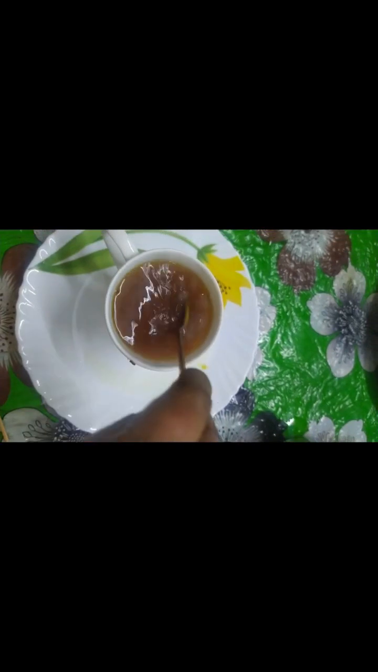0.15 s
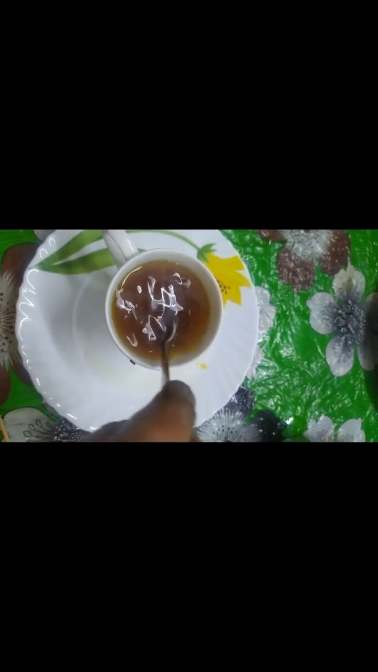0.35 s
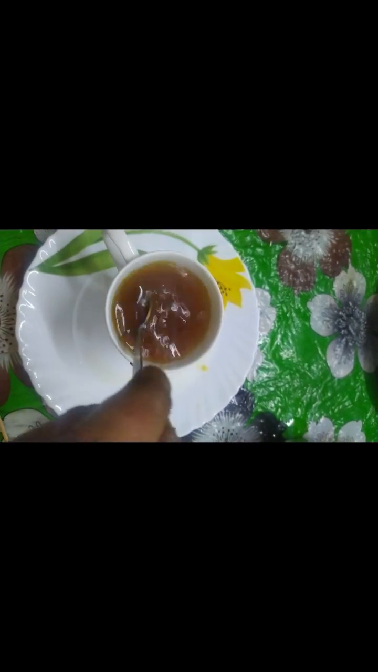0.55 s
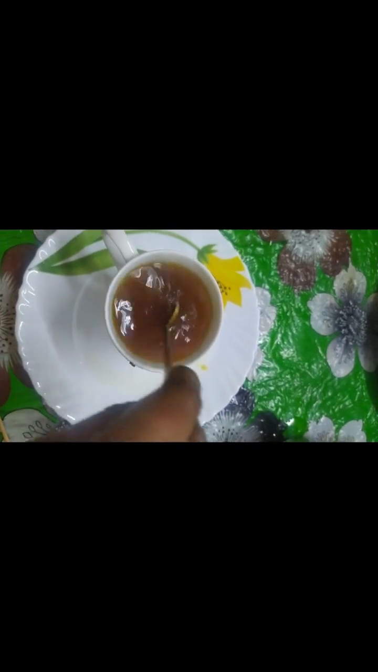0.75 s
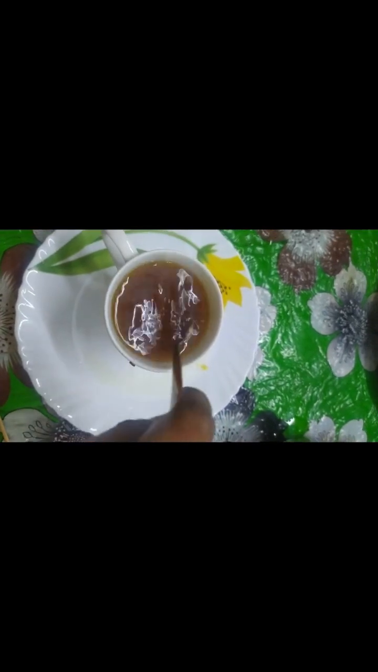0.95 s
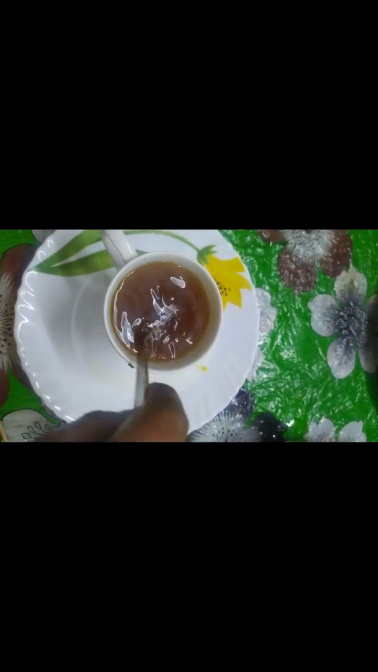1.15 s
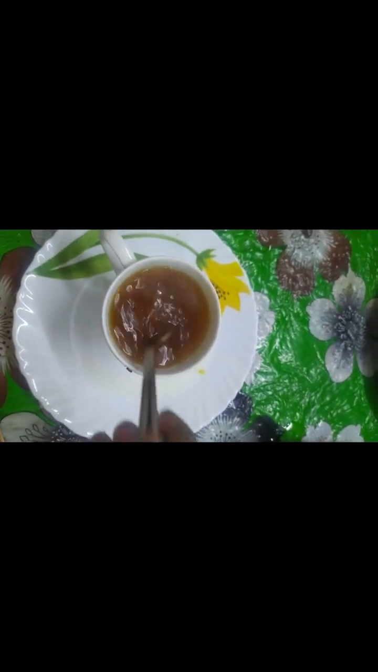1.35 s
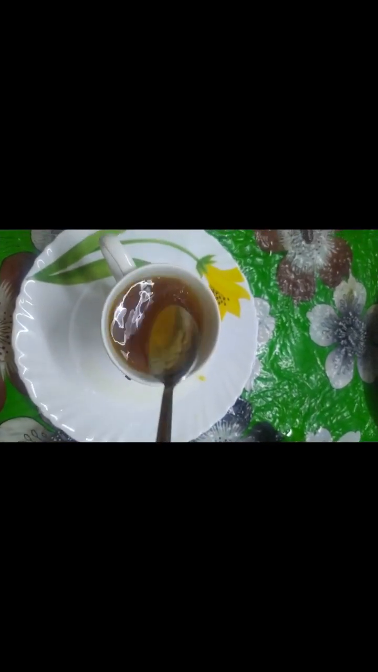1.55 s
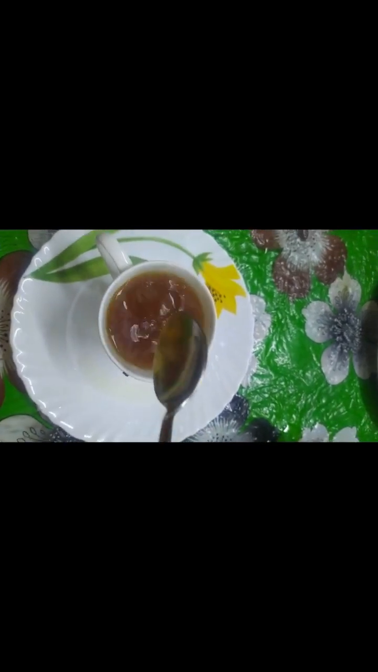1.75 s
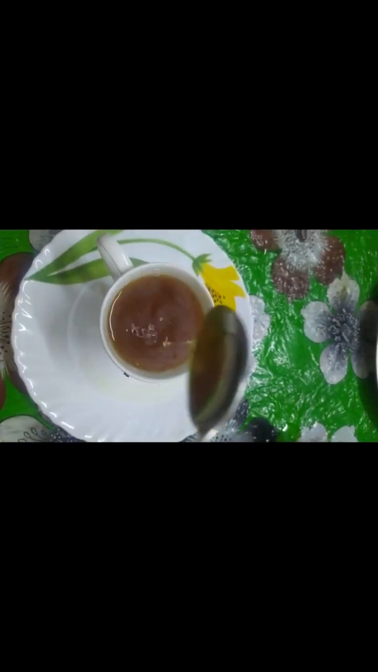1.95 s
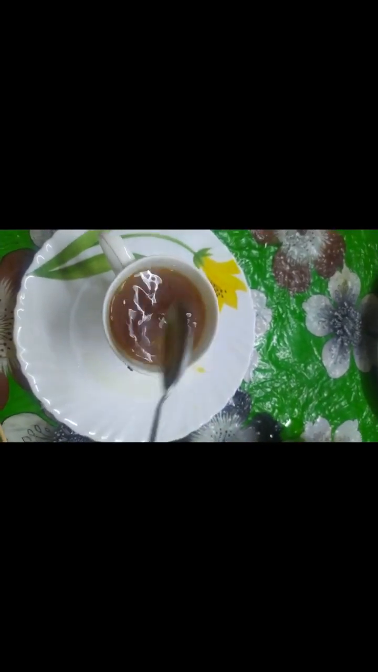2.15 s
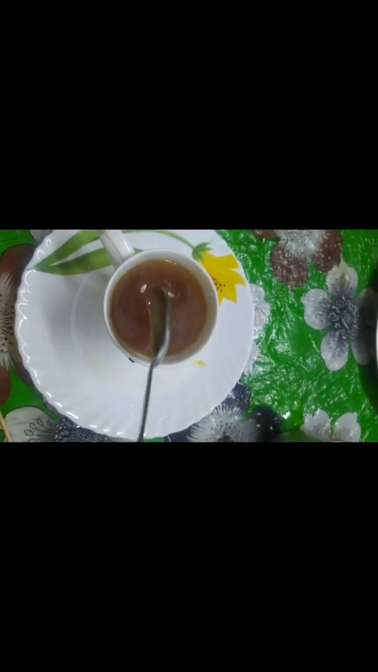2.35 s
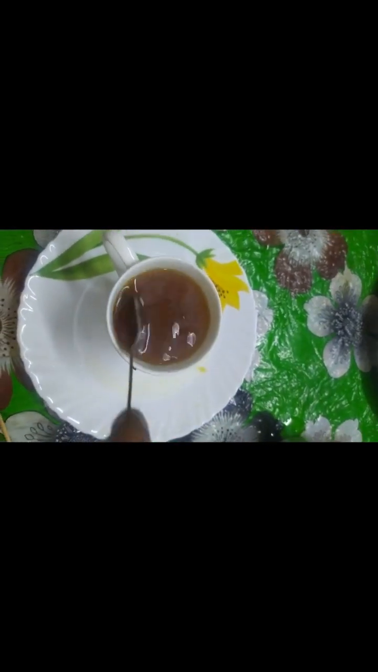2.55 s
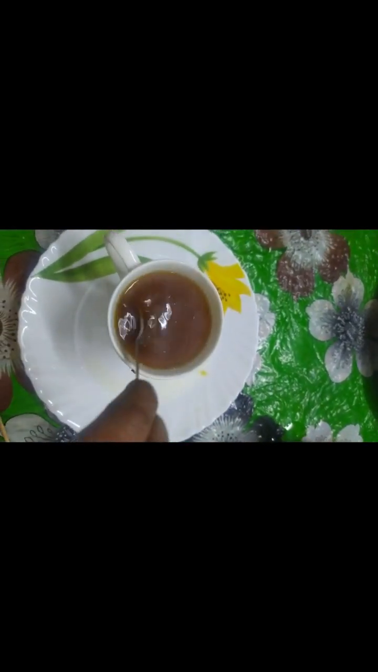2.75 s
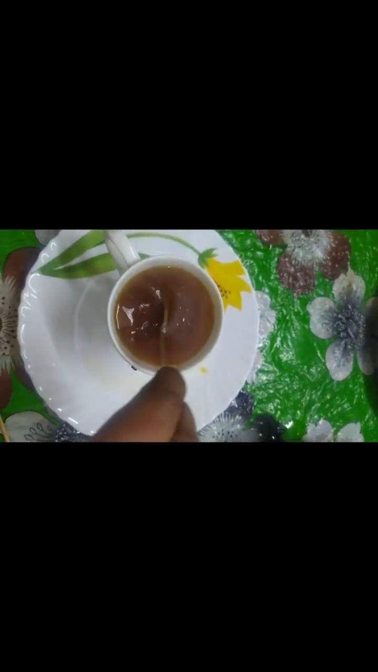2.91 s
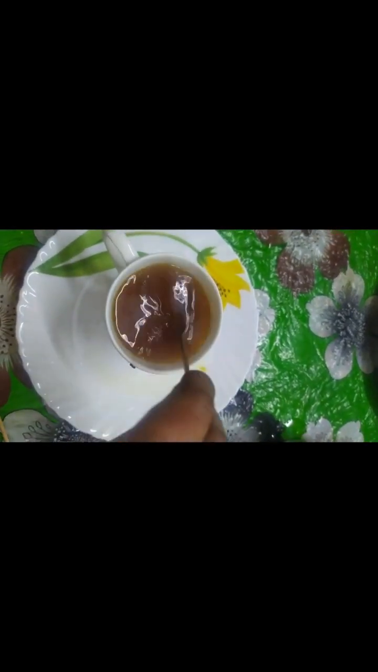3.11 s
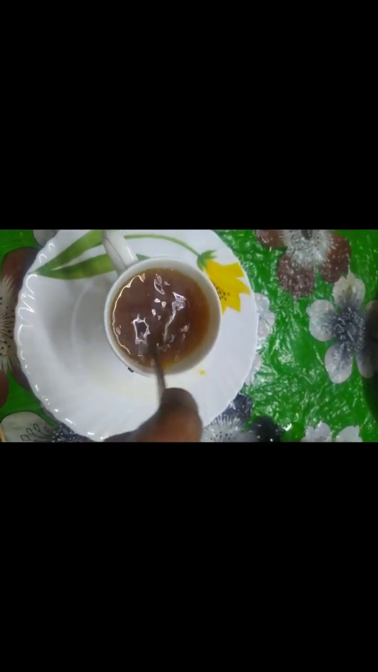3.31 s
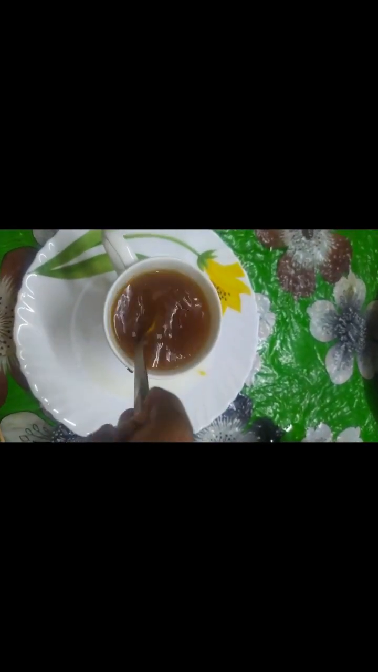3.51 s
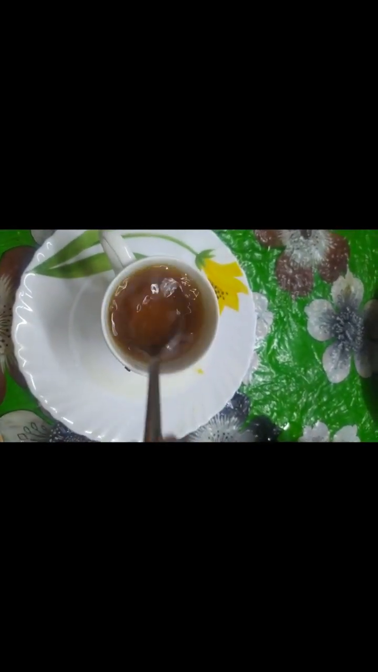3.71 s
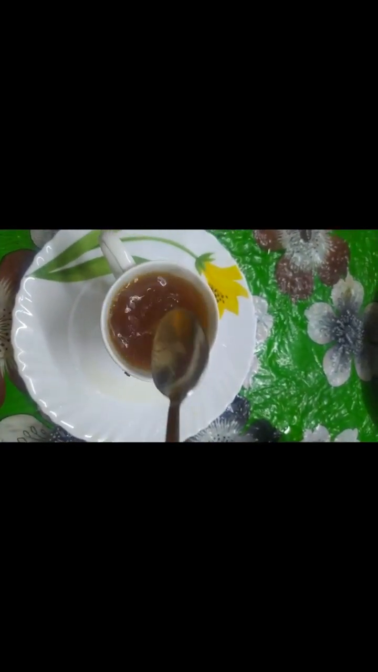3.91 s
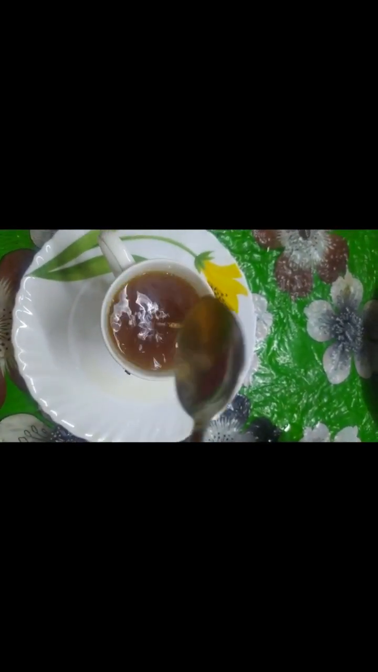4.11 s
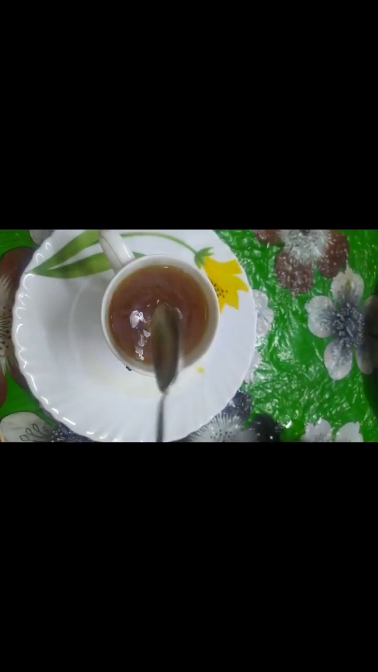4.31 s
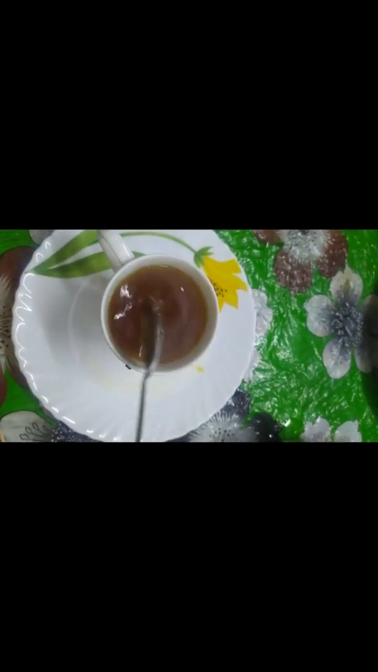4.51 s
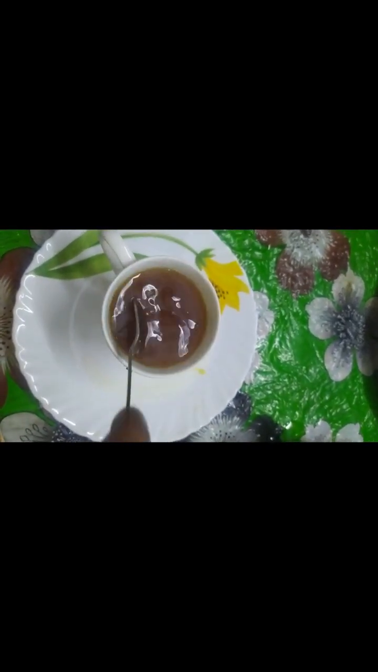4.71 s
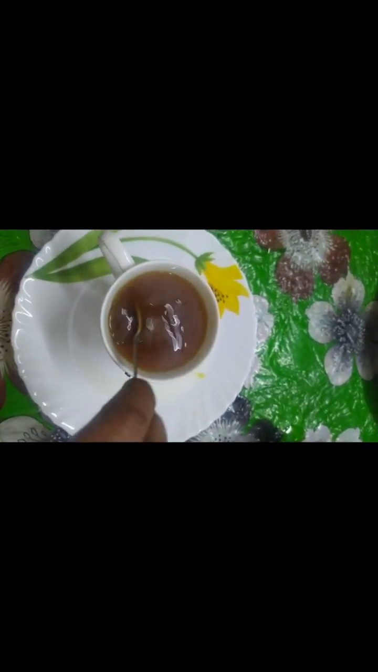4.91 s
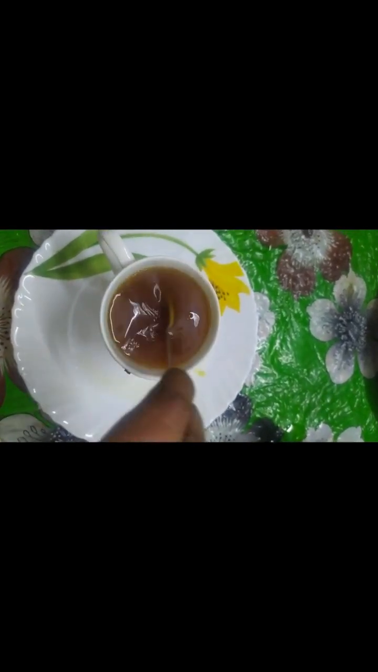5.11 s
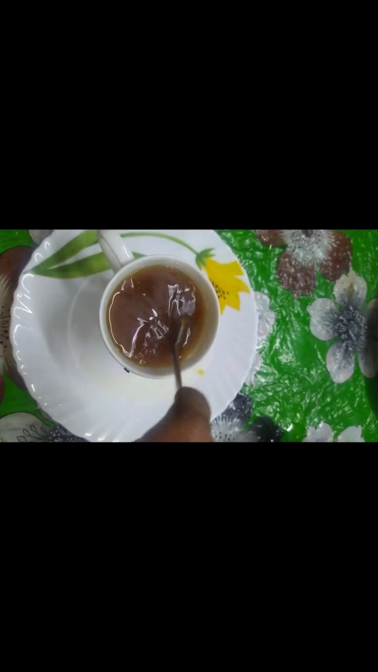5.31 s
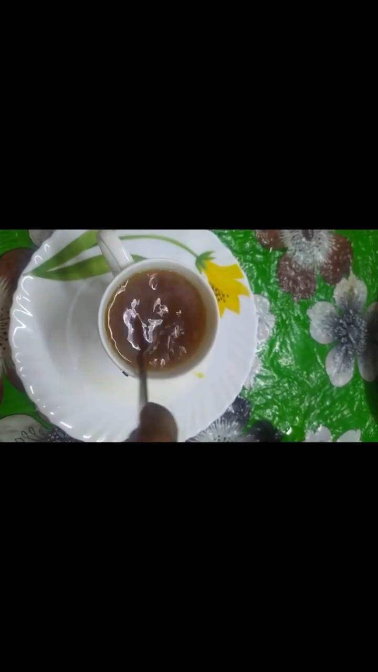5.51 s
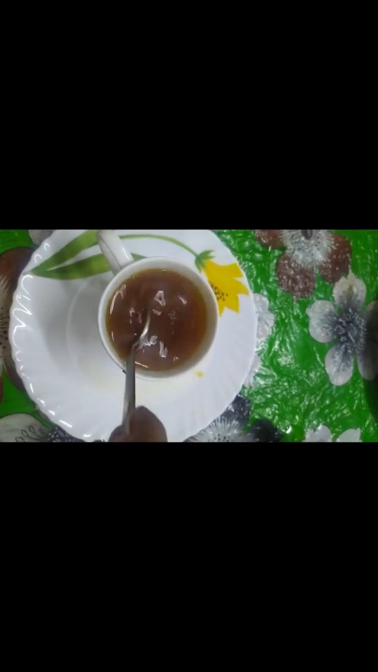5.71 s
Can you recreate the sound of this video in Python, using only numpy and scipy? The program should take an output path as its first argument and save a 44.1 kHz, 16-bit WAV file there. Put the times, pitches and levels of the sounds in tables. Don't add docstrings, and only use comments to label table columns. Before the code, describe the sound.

A steel spoon stirs tea in a small ceramic cup, with bright ringing clinks, faint scrapes and wet sloshing, in three bouts separated by quiet pauses.

```python
import sys
import numpy as np
from scipy import signal
from scipy.fft import rfft, irfft, next_fast_len
from scipy.io import wavfile
from scipy.ndimage import uniform_filter1d, map_coordinates

SR = 44100
rng = np.random.default_rng(int(sys.argv[2]) if len(sys.argv) > 2 else 0)


def wav_record(signal):
    frames = np.transpose(np.atleast_2d(signal))
    bounded = np.clip(frames, -1, 1)
    quanta = np.round(bounded * 32767).astype(np.int16)
    wavfile.write(sys.argv[1], SR, quanta)


def gain_from_db(level_db):
    decades = np.asarray(level_db, float) / 20
    return 10 ** decades


N = 258426


def unit(x):
    return x / np.sqrt(np.mean(x ** 2) + 1e-20)


def along(points, hz):
    f, v = np.transpose(points)
    return np.interp(np.log(hz + 1), np.log(f + 1), v)


def wobble(rate):
    knots = rng.standard_normal(int(N * rate / SR) + 4)
    return map_coordinates(knots, [np.arange(N) * rate / SR])


def jitter(count):
    return np.interp(np.arange(N), np.linspace(0, N, count), rng.standard_normal(count))


def swells(rows, column, rise_db_s, fall_db_s, rest_db):
    t = np.arange(0, N + 64, 64) / SR
    rows = np.array(rows)
    late = t - rows[:, :1]
    peaks_db = rows[:, column, None] + np.minimum(rise_db_s * late, -fall_db_s * late)
    power = np.sum(gain_from_db(peaks_db) ** 2, axis=0) + gain_from_db(rest_db) ** 2
    return np.interp(np.arange(N) / SR, t, 10 * np.log10(power))


def rush(spectrum, alike):
    m = next_fast_len(N)
    hz = np.fft.rfftfreq(m, 1 / SR)
    turn = np.arccos(np.clip(along(alike, hz), -1, 1)) / 2
    noise = rfft(rng.standard_normal((2, m)))
    colour = gain_from_db(along(spectrum, hz))
    mid, side = irfft(noise * colour * [np.cos(turn), np.sin(turn)], m)[:, :N]
    return unit(np.array([mid + side, mid - side]))


def ring(times, db, pan_db, hz, t60, scatter_db, rub, waver, rough):
    chance = rng.standard_normal((len(times), 4))
    side = np.array([[.5], [-.5]])
    apart = min(1.55, np.mean(hz) / 1100) * side
    scatter = scatter_db * apart * chance[:, :2].T + scatter_db * chance[:, 0]
    phase = 0.27 * chance[:, 2] + apart * (0.84 + 0.4 * chance[:, 3])
    kick = gain_from_db(db + side * pan_db + scatter) * np.exp(1j * phase)
    noise = rng.standard_normal(2 * N).view(complex)
    rub_gain = rub * np.sqrt(2 * np.log(1000) / (t60 * SR))
    force = rub_gain * noise * np.exp(1j * apart * rng.normal())
    force[:, np.round(times * SR).astype(int)] += kick
    soft = np.exp(-1 / (0.00029 * SR))
    fade = gain_from_db(-60 / (t60 * SR))
    swing = signal.lfilter([1 - soft], np.convolve([1, -soft], [1, -fade]), force)
    pitch = hz * (1 + waver * jitter(count=240))
    crowd = 300 + int(np.mean(hz)) // 6
    beats = 1 + rough * (jitter(crowd) + 1j * jitter(crowd))
    return np.real(swing * (beats * np.exp(2j * np.pi * np.cumsum(pitch) / SR)))


def swirl():
    stirs = [
        -.4,
        2.62,
        4.59,
    ]
    t = np.arange(N) / SR
    latest = np.array(stirs)[np.searchsorted(stirs, t, "right") - 1]
    return 1 - np.exp(-(t - latest) / .5)


def tea_pitches():
    # time in seconds, size (1 is a full heap).
    surges = [
        (0.249, 1.05),
        (0.651, 0.365),
        (0.981, .8),
        (2.4, 0.0078),
        (3.161, 0.95),
        (3.519, 0.503),
        (5.267, 0.76),
    ]
    # pitch at rest in Hz, Hz added by full swirl, Hz added by a full surge.
    bends = [
        (1915, -22, -25),
        (2028, 20, -80),
        (5280, -90, -25),
        (4592, -15, -70),
    ]
    heap_s, settle_s = 0.045, 0.31
    t, turn = np.arange(N) / SR, swirl()
    surge = sum(size * np.interp(t, [s - heap_s, s, s + settle_s], [0, 1, 0]) for s, size in surges)
    return [hz + by_swirl * turn + by_surge * surge for hz, by_swirl, by_surge in bends]


def notes(times, level_db, modes, pitches, pan_db, scrape, waver, rough):
    still_rough, turning_rough = .45, 1.3
    blur = still_rough + (turning_rough - still_rough) * swirl()
    return sum(ring(times, level_db[k], pan_db[k], pitches[k], t60, 0.93, gain_from_db(rub_db) * scrape, waver, rough[k] * blur)
               for k, (t60, rub_db) in enumerate(modes))


def contacts():
    # time in seconds, strength in dB, edge (bright over dull part) in dB, left-right in dB.
    blows = [(0.253, -19, 5.5, -4.5), (0.379, -32.5, -20, 5), (0.6245, -24.5, -6, -6),
             (0.7287, -31, -19, -9), (0.7827, -24.5, -8, -6.5), (0.9808, -24.5, 1.5, -6.5),
             (1.0512, -25, -10, 1), (1.2007, -46.5, -6, 12), (1.212, -28.5, -11, -7),
             (2.6341, -24.5, 5, -9.5), (3.154, -20.5, 8, -10), (3.474, -37, -9.5, -5),
             (3.489, -15.5, -21, -7), (4.5979, -9.5, -13.5, -6.5), (4.683, -18.5, -6.5, -7.5),
             (4.8348, -33, -3, -9), (4.929, -13, -19, -6), (5.239, -41, 0, -14), (5.2674, -19.5, 9.5, -5.5),
             (5.3654, -25, -11.5, -3), (5.5997, -31.5, -10.5, -9), (5.676, -26.5, -1, -6)]
    # time in seconds, strength in dB, edge in dB.
    taps = [(0.0174, -38.5, -16), (0.1208, -47.5, -5), (0.4621, -48, -10), (0.4876, -39.5, -18),
            (1.17, -55, 5), (2.6054, -73, 4), (2.81, -62, -9), (2.9, -59.5, 2), (2.947, -44.5, -9),
            (2.981, -59.5, 5), (3.01, -61, 6), (3.334, -70, 4), (3.3893, -46.5, 4), (3.4074, -40, -14),
            (4.2954, -48, -17), (5.07, -50.5, 5.5), (5.458, -39, -5), (5.541, -42, -10)]
    tap_pan_db = -13
    s, db, edge_db, pan_db = np.transpose(blows + [(*tap, tap_pan_db) for tap in taps])
    knock_db = -27.5 + 0.62 * db - 0.26 * np.maximum(edge_db, -16)
    snap_db = db + 0.8 * edge_db
    return np.c_[s, knock_db, db, db + edge_db, pan_db, snap_db]


def body(modes, column, gain_db, rub, pan_share, waver):
    hits = contacts()
    level_db = hits[:, column] + gain_db
    pan_db = pan_share * hits[:, 4]
    return sum(ring(hits[:, 0], level_db + db, pan_db, hz, t60, 2.8, rub * gain_from_db(db), waver, 0.42)
               for hz, db, t60 in modes)


def cracks(colour, column, gain_db, pan_share, sharp, slow, tail_db):
    envelope, t = np.zeros((2, N + SR)), np.arange(SR // 3) / SR
    shape = (1 - np.exp(-t / 0.00022)) * (gain_from_db(-60 * t / sharp) + gain_from_db(tail_db - 60 * t / slow))
    for hit in contacts():
        level = gain_from_db(hit[column] + gain_db + np.array([[.5], [-.5]]) * pan_share * hit[4])
        envelope[:, round(hit[0] * SR):][:, :len(t)] += level * shape
    return envelope[:, :N] * rush(colour, [(500, 0.048), (8000, 0.06)])


def room_tone():
    # time in seconds, level in dB.
    traffic = [(0.41, -49), (.8, -57.5), (1.1, -53), (1.45, -54), (1.75, -79), (2.1, -60.5), (2.85, -56),
               (3.26, -51.5), (3.7, -56), (4, -54.5), (4.77, -55), (5.1, -49), (5.7, -52.5)]
    # time in seconds, level in dB.
    loads = [(1.35, -76), (1.96, -69), (2.75, -58), (3, -57.5), (3.26, -57.5), (4.26, -89), (4.6, -52.5),
             (4.77, -55), (5.16, -52), (5.45, -54), (5.8, -50.5)]
    # frequency in Hz, level in dB per Hz.
    air = [(12, -18), (20, 1.5), (63, -12.5), (81, -5), (143, -16.5), (169, 3.5), (244, -2), (281, -1),
           (382, -8.5), (599, -14), (1050, -24), (1180, -25), (11400, -35), (15200, -43), (16500, -65.5)]
    # frequency in Hz, likeness 0-1.
    likeness = [(60, 0.053), (150, 1), (380, 0.89), (950, 0), (2380, 0.11), (5980, 0.0), (15000, 0.38)]
    # frequency in Hz, level in dB.
    hums = [(174, -69), (281, -65)]
    rumble_db = swells(traffic, column=1, rise_db_s=38.0, fall_db_s=19.0, rest_db=-56.5)
    hum_db = swells(loads, column=1, rise_db_s=74, fall_db_s=39.5, rest_db=-71.0)
    low = [(hz, db if hz < 900 else -120) for hz, db in air]
    high = [(hz, db if hz > 500 else -120) for hz, db in air]
    hum = gain_from_db(hum_db + 3 * wobble(9)) * np.sin(2 * np.pi * np.cumsum(121 + 2.7 * wobble(6.6)) / SR)
    for hz, db in hums:
        hum += gain_from_db(db + 0.97 * wobble(5.5)) * np.sin(2 * np.pi * np.cumsum(hz + 4 * wobble(11)) / SR)
    rumble = gain_from_db(rumble_db + 0.54 * wobble(12)) * rush(low, likeness)
    hiss = gain_from_db(-66.0) * rush(high, likeness)
    return rumble + hiss + hum


def stirring():
    # time in seconds, slosh level in dB, scrape level in dB.
    strokes = [(0.0, -50.5, -57), (.25, -56, -61.5), (0.49, -55, -57.5), (0.7, -49.5, -56),
               (.93, -56.5, -61.5), (1.16, -47.5, -51.5), (1.29, -63, -69.5), (2.72, -62, -76),
               (2.84, -55, -57.5), (2.97, -55.5, -57), (3.2, -52.5, -70), (3.33, -49, -51),
               (3.51, -46.5, -49.5), (3.7, -60.5, -68), (4.67, -56.5, -86), (4.77, -58, -52.5),
               (5.03, -49, -53.5), (5.16, -54, -57.5), (5.29, -49, -50.5), (5.42, -51.5, -53),
               (5.57, -54.5, -62), (5.73, -55.5, -69)]
    slosh_db = swells(strokes, column=1, rise_db_s=121.5, fall_db_s=95.5, rest_db=-76.0)
    scrape_db = swells(strokes, column=2, rise_db_s=111, fall_db_s=93.5, rest_db=-89.5)
    scrape = gain_from_db(scrape_db + 3.5 * wobble(70))
    slosh = gain_from_db(slosh_db + 4.3 * wobble(22.34))
    return slosh_db, slosh, scrape


def scraping(scrape):
    # frequency in Hz, level in dB per Hz.
    colour = [(900, -25.5), (1500, -9.5), (2400, 0), (3400, -11.5), (4500, -12.5), (6000, -10.5),
              (7300, -13), (8200, -4), (9500, -6.5), (10700, -15.5), (11400, -25), (13900, -16),
              (16000, -57.5)]
    return gain_from_db(-3.5) * scrape * rush(colour, [(1000, 0.44), (8000, 0.066)])


def sloshing(slosh):
    # frequency in Hz, level in dB per Hz.
    colour = [(150, -38.5), (300, -5.5), (420, -6.5), (600, -5.5), (850, 3), (1100, -14.5), (2000, -14),
              (4000, -48.5)]
    return slosh * rush(colour, [(300, 1.0), (900, 0.27)])


def gurgles(slosh_db, count=500):
    chance, t = rng.random((count, 4)), np.arange(SR // 40) / SR
    start = (chance[:, 0] * N).astype(int)
    hz = 350 * 4.5 ** chance[:, 1:2]
    size = gain_from_db(slosh_db[start] - 3.5 - 12 * chance[:, 2])[:, None]
    envelope = np.exp(-t * hz / 4) * (1 - np.exp(-t / .002))
    blips = size * envelope * np.sin(2 * np.pi * hz * (t + 1.0 * t * t))
    where = (start[:, None] + np.arange(len(t))).ravel()
    sides = []
    for way in (1, -1):
        panned = blips * gain_from_db(1.4 * way * (chance[:, 3:] + 6.0))
        sides.append(np.bincount(where, panned.ravel(), N + SR)[:N])
    return np.array(sides)


def spoon_notes(scrape):
    # time in seconds, strength in dB, place (tip -1 to flank 1),
    # rim note in dB and saucer in dB, both over the strength.
    chimes = [(0.014, -72.5, 0.43, 2, 20), (0.254, -52, -0.041, 3.5, -12), (0.6245, -67, 0.11, -23, 23),
              (0.7808, -59, -0.63, -14, 7), (0.978, -52, 0.54, 7, -19), (1.0514, -58, 0.68, -12, 8),
              (1.17, -69, -0.36, 18.5, 10), (1.212, -65, -1.5, 15, 12), (2.6293, -42.5, 0.051, -19, -22),
              (2.946, -64.5, .3, -18.5, -9), (3.1536, -44.5, -0.41, 2, -13), (3.2273, -56, 0.56, 8.5, 6),
              (3.486, -56, 0.18, -8, 25), (4.596, -32, -0.51, 10, 5), (4.6816, -44.5, -1.2, 14.5, 13.5),
              (4.8327, -66, -1.6, 5, -7), (4.9283, -59, 0.71, 14, 27), (5.267, -49, 0.74, 8, -14),
              (5.364, -60.5, -.7, 5.5, 3), (5.597, -55, -0.33, 11, 2), (5.674, -49, 0.54, -11, -5)]
    # t60 in seconds, response to dragging in dB.
    overtones = [
        (0.37, -23.5),
        (0.085, -24),
        (0.4, -18),
        (0.23, -16),
        (0.057, -16.5),
    ]
    steady_hz = [
        3450,
        8572,
        9890,
        10680,
    ]
    # level in dB, dB gained from middle to flank.
    spoon_shape = [
        (-4.5, 22),
        (-5, -11.5),
        (3.5, -2),
    ]
    s, db, place, rim_db, saucer_db = np.transpose(chimes)
    rim_hz = tea_pitches()[-1]
    rest = [base_db + gain_db * place for base_db, gain_db in spoon_shape]
    return notes(s, db + [rim_db, saucer_db, *rest], overtones, [rim_hz, *steady_hz],
                 [-3.6, 4.5, -9.5, -11, 17.5], scrape, 0.001, [0.51, 1.1, .3, 1.06, 0.51])


def wall_notes(scrape):
    # time in seconds, strength in dB, degrees from the handle,
    # rim over wall in dB.
    blows = [(0.0162, -50.5, 6.1, -30), (0.2567, -30, 17, -9), (0.379, -42.5, 48, -13.5),
             (0.46, -48, 33, -15), (0.485, -44.5, 45, -19.5), (0.6241, -35, 33, -10),
             (0.7792, -37, 33, -10), (0.979, -33, 39.6, -1), (1.05, -40, 28, -36), (1.1692, -36.5, 48, -25),
             (1.2133, -38.5, 8.5, -6), (2.6325, -27.5, 16.5, -19), (3.153, -31.5, 13, -15.5),
             (3.227, -60, 45, -2.5), (3.3312, -38.5, 47, -18), (3.3894, -41, 45, -21.5),
             (3.485, -38.5, 21, -1), (4.596, -18.5, 34.7, -16.5), (4.6823, -34, 5.9, -35),
             (4.834, -36, 7, -7.5), (4.9278, -36.5, 42, -36), (5.268, -33, 22, -34), (5.362, -62, 46, -37),
             (5.469, -44.5, 31, -8.5), (5.54, -44.5, 32, -33), (5.597, -73, 38, -14),
             (5.676, -40, 17, -12.5)]
    # t60 in seconds, response to dragging in dB.
    modes = [
        (0.36, -24),
        (0.45, -12.5),
        (0.43, -20),
    ]
    s, db, degrees, rim_db = np.transpose(blows)
    wall_hz = tea_pitches()[:3]
    oval = 2 * np.radians(degrees)
    share_db = 20 * np.log10(np.abs([np.cos(oval), np.sin(oval)]) + 0.0124)
    return notes(s, db + [*share_db, rim_db], modes, wall_hz, [-5, 3.5, 1.0], scrape, .002, [.45, 0.5, 0.8])


def clack():
    # frequency in Hz, level in dB per Hz.
    colour = [(200, -36.5), (700, -9.5), (1400, -0.5), (2500, 3.5), (4500, 1), (6000, -0.5), (7000, -7),
              (9000, -29.5)]
    return cracks(colour, column=2, gain_db=-7.5, pan_share=0.223, sharp=0.012, slow=0.13, tail_db=-8.0)


def tick():
    # frequency in Hz, level in dB per Hz.
    colour = [(5000, -32.5), (7400, -15), (8100, -2.5), (9500, 6.5), (10700, -13), (11200, -6),
              (13500, -28.5), (16000, -45.5)]
    return cracks(colour, column=3, gain_db=2.0, pan_share=1.4, sharp=0.014, slow=0.67, tail_db=-32.5)


def snap():
    # frequency in Hz, level in dB per Hz.
    colour = [(9000, -39.5), (11500, 8.5), (14500, -5.5), (16400, -9.5)]
    return cracks(colour, column=5, gain_db=-9, pan_share=0.72, sharp=0.005, slow=0.05, tail_db=-32.5)


def table_knock(slosh):
    # frequency in Hz, level in dB, t60 in seconds.
    modes = [(180, -11, .1), (340, -4, .07), (420, -4, .07), (560, -2, .06), (690, 0, .07), (847, -8, .1),
             (1400, -7, .05)]
    return body(modes, column=1, gain_db=-4.5, rub=gain_from_db(-16) * slosh, pan_share=0.25, waver=0.00957)


def saucer_clink(scrape):
    # frequency in Hz, level in dB, t60 in seconds.
    modes = [(2328, 0, 0.023), (2532, -7.5, 0.031), (2920, -14, 0.06), (3230, -14, 0.06)]
    return body(modes, column=2, gain_db=-12.5, rub=gain_from_db(-13.0) * scrape, pan_share=0.089, waver=0.0034)


def spoon_clink(scrape):
    # frequency in Hz, level in dB, t60 in seconds.
    modes = [(8530, -4.5, 0.093), (8500, -7, 0.15), (8850, -7, 0.14), (9540, -8.5, 0.16), (10040, -8, 0.11),
             (11400, -9, 0.07)]
    return body(modes, column=3, gain_db=-23.0, rub=gain_from_db(-18) * scrape, pan_share=1.0, waver=0.0028)


def undertones(scrape):
    # time in seconds, bowl in dB, saucer well in dB, shank in dB.
    blows = [(0.2524, -42.5, -51, -40), (0.38, -51, -58, -60), (0.4624, -46, -48, -61),
             (0.624, -60, -48, -55), (0.728, -51, -51, -61), (0.7816, -41.5, -53, -54),
             (0.9797, -38, -43, -40), (1.051, -44, -42, -54), (1.169, -76, -36.5, -64),
             (1.2121, -62, -38.5, -58), (2.6339, -37, -53, -45), (2.9462, -68.5, -54.5, -68),
             (3.1544, -38, -40.5, -23), (3.2291, -46, -42, -39), (3.3884, -51, -52, -61),
             (3.4891, -61, -31, -56), (4.599, -27.5, -26, -27.5), (4.6823, -28.5, -37, -32),
             (4.8334, -44, -57, -55), (4.9292, -61, -34, -56), (5.2673, -39, -53, -37),
             (5.3647, -59, -37.5, -40), (5.5984, -46, -40, -64), (5.674, -63, -50, -48)]
    # t60 in seconds, response to dragging in dB.
    modes = [
        (0.37, -19),
        (0.28, -19),
        (0.105, -27),
    ]
    pitches = [
        3862,
        2450,
        9120,
    ]
    s, *level_db = np.transpose(blows)
    gain_db = np.array([[-10.5], [-7.5], [-4.5]])
    return notes(s, level_db + gain_db, modes, pitches, [6.0, -1.5, -6.0], scrape, 0.0013, [.6, .7, .5])


def short_partials(scrape):
    # time in seconds, foot in dB, lip in dB, flank in dB, neck in dB.
    blows = [(0.2530, -47, -39, -42, -62), (0.6241, -41, -72, -42, -79), (0.7811, -58, -70, -56, -79),
             (0.9796, -41, -49, -40, -63), (1.0512, -62, -72, -46, -71), (1.2121, -49, -82, -72, -81),
             (2.6334, -41.5, -38.5, -39, -64), (2.9467, -77.5, -66.5, -68.5, -72),
             (3.1537, -38, -35, -49, -54.5), (3.488, -62, -38, -39.5, -80), (4.596, -43, -34.5, -62, -44),
             (4.6824, -41, -37, -42, -53), (4.8335, -57, -51.5, -54, -87), (4.9288, -70, -43, -61, -70),
             (5.0600, -82.5, -78, -78, -58), (5.2675, -39, -44, -39, -52.5), (5.3647, -51, -62, -70, -73),
             (5.5992, -50, -63, -81, -78), (5.674, -58, -54, -49, -61)]
    # t60 in seconds, response to dragging in dB.
    modes = [
        (0.055, -23.5),
        (0.069, -24.5),
        (0.035, -24.5),
        (.18, -34),
    ]
    pitches = [
        4320,
        6030,
        7720,
        13600,
    ]
    s, *level_db = np.transpose(blows)
    return notes(s, np.array(level_db) + 2.5, modes, pitches, [0, -4.5, -8.5, 2.5], scrape, .002,
                 [.8, 0.66, 0.52, 1.3])


def drip():
    # time in seconds, level in dB, pitch in Hz, t60 in seconds.
    bubbles = [
        (0.664, -30, 2440, 0.028),
        (1.239, -36.5, 370, 0.1),
        (2.815, -31.5, 800, 0.024),
        (2.99, -39, 780, 0.053),
        (3.051, -41.5, 784, 0.053),
        (3.334, -32, 352, 0.074),
        (4.2957, -20.5, 2364, 0.015),
        (5.598, -23.5, 2127, 0.048),
    ]
    out, t = np.zeros(N + SR), np.arange(SR // 10) / SR
    for s, db, hz, t60 in bubbles:
        envelope = gain_from_db(db - 60 * t / t60) * (1 - np.exp(-t / 0.0029))
        out[round(s * SR):][:len(t)] += envelope * np.sin(2 * np.pi * hz * (t + 3 * t * t))
    return out[:N] * gain_from_db([[1.5], [-1.5]])


def kitchen(x):
    # frequency in Hz, t60 in seconds.
    decay = [(200, 0.39), (1000, 0.99), (3000, 0.73), (9000, 0.29), (15000, 0.27)]
    hz, t, z = signal.stft(rng.standard_normal((2, SR // 2)), SR, nperseg=256)
    bass_db = along([(150, -10), (800, -15.5)], hz)[:, None]
    fade_db = bass_db - 60 * t / along(decay, hz)[:, None]
    tail = signal.istft(z * gain_from_db(fade_db), SR, nperseg=256)[1]
    late = np.pad(x, ((0, 0), (180, 0)))
    return signal.fftconvolve(late, tail / np.linalg.norm(tail[0]), axes=1)[:, :N]


def scene():
    slosh_db, slosh, scrape = stirring()
    near = scraping(scrape) + sloshing(slosh) + gurgles(slosh_db)
    near += spoon_notes(scrape) + wall_notes(scrape)
    near += clack() + tick() + snap()
    near += table_knock(slosh) + saucer_clink(scrape) + spoon_clink(scrape)
    near += undertones(scrape) + short_partials(scrape) + drip()
    return near + gain_from_db(-9.5) * kitchen(near) + room_tone()


def starved(x, reach=130, streak=3, chance_db=4.5):
    # frequency in Hz, depth in dB.
    masked = [(2400, 40), (3000, 19), (4200, 12), (5800, 7), (7200, 9.5), (8200, 17), (10600, 17),
              (11300, 6), (13000, 5), (15000, 9)]
    hz, t, z = signal.stft(x, SR, nperseg=1024)
    power = uniform_filter1d(np.mean(abs(z) ** 2, axis=0), streak, 1)
    luck = uniform_filter1d(rng.standard_normal(power.shape), streak, 0)
    luck = uniform_filter1d(luck, 3 * streak, 1)
    margin = gain_from_db(chance_db * unit(luck) - along(masked, hz)[:, None]) ** 2
    kept = uniform_filter1d(power, 2 * streak, 0) > margin * uniform_filter1d(power, reach, 0)
    return signal.istft(z * kept, SR, nperseg=1024)[1][:, :N]


def roll_off(x):
    return signal.sosfilt(signal.butter(12, 16540, fs=SR, output="sos"), x)


def record(dry):
    # frequency in Hz, gain in dB.
    port = [(6200, -1), (7300, 1.5), (8200, -0.5), (10800, 1), (11600, -0.5)]
    m = next_fast_len(N)
    hz = np.fft.rfftfreq(m, 1 / SR)
    kept = irfft(rfft(dry, m) * gain_from_db(along(port, hz)) * (hz < 16500), m)[:, :N]
    mix = starved(kept)
    return roll_off(mix)


dry = scene()
out = record(dry)
wav_record(out)
```